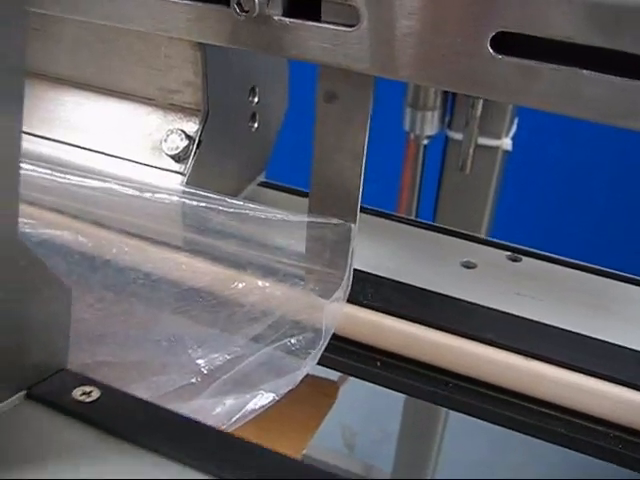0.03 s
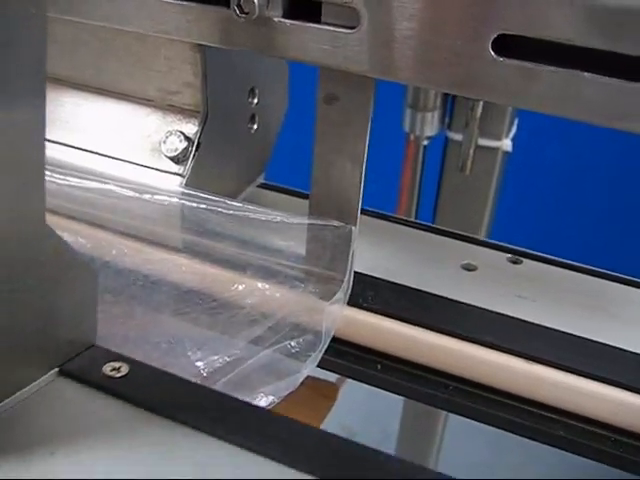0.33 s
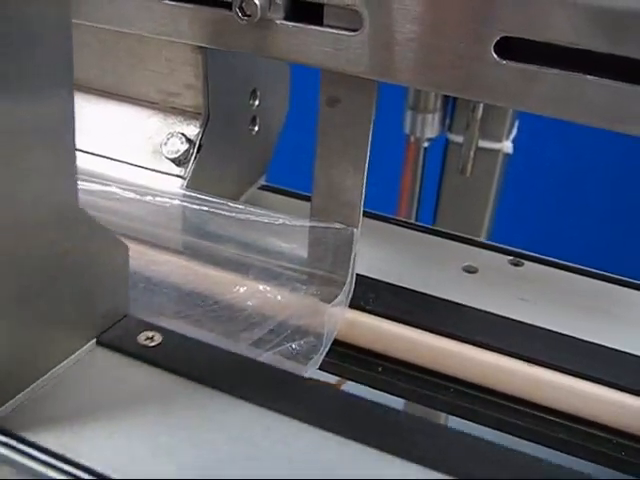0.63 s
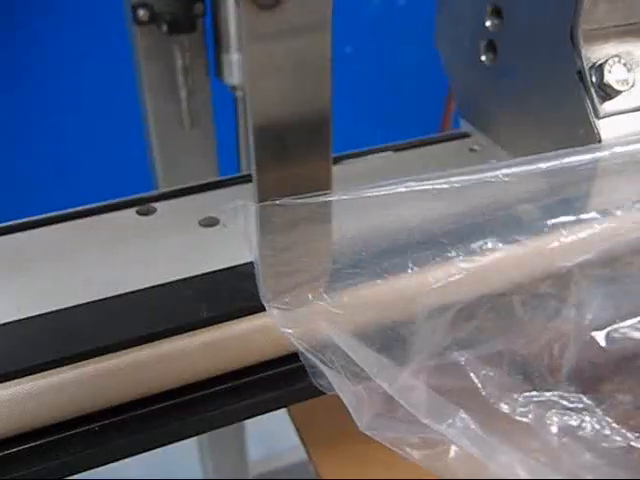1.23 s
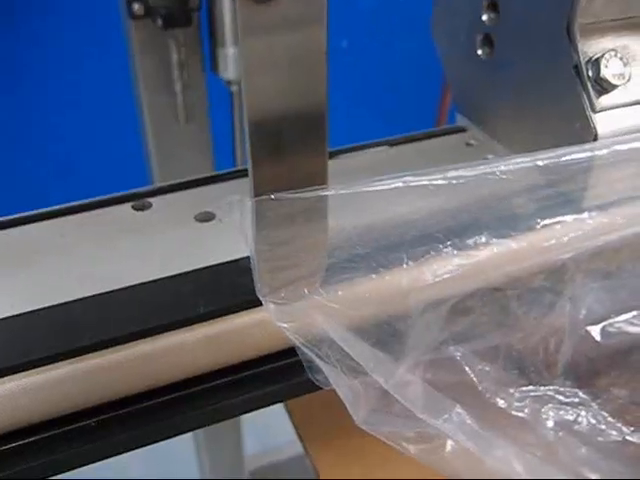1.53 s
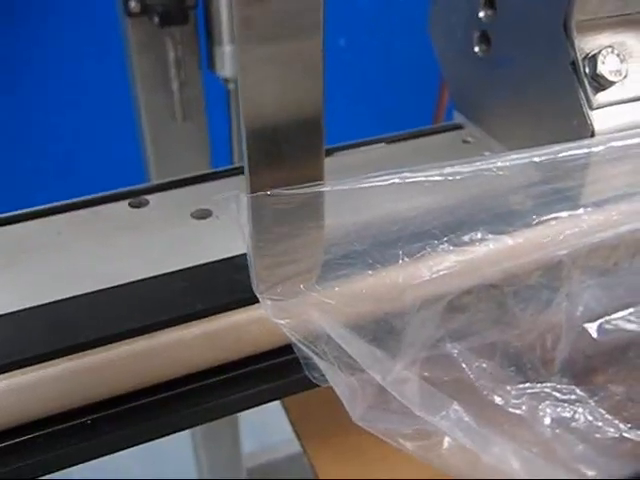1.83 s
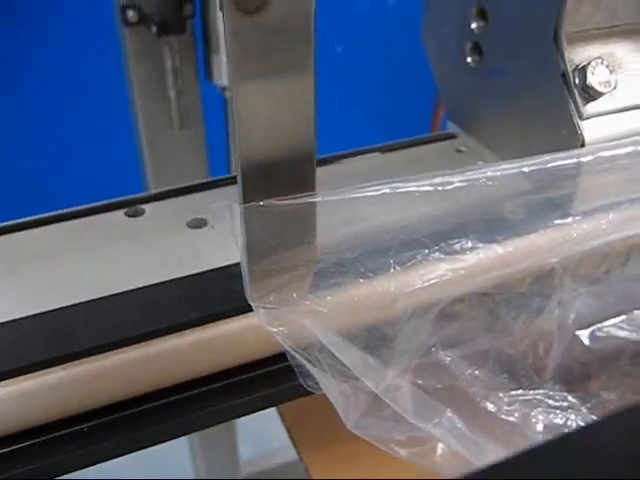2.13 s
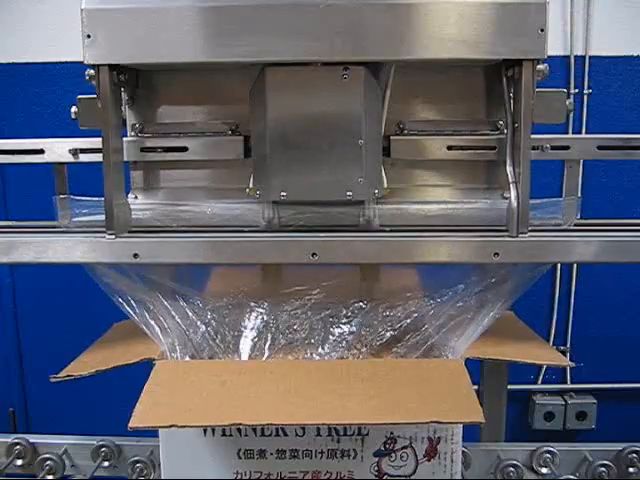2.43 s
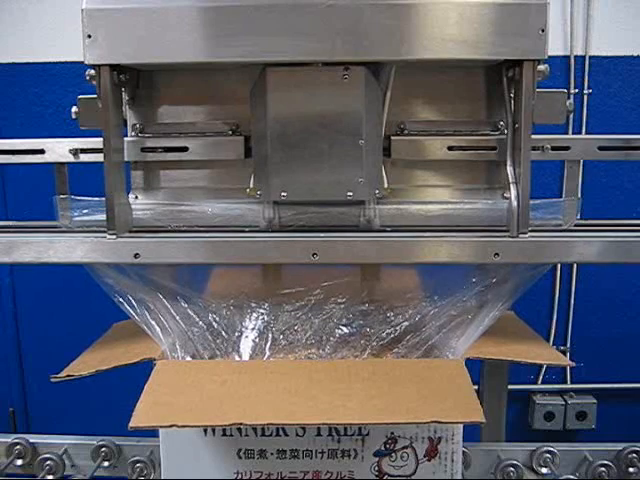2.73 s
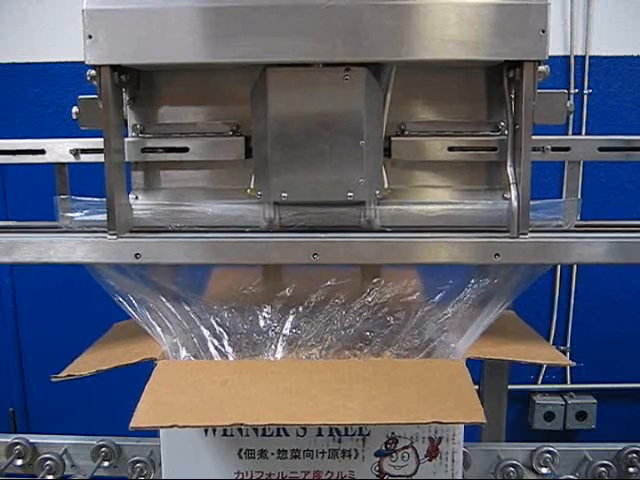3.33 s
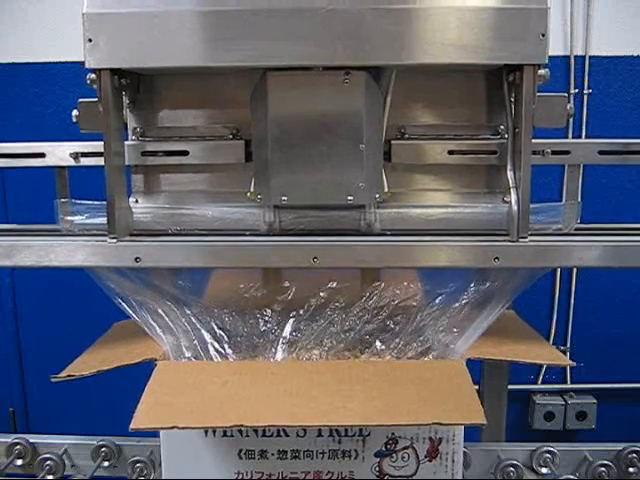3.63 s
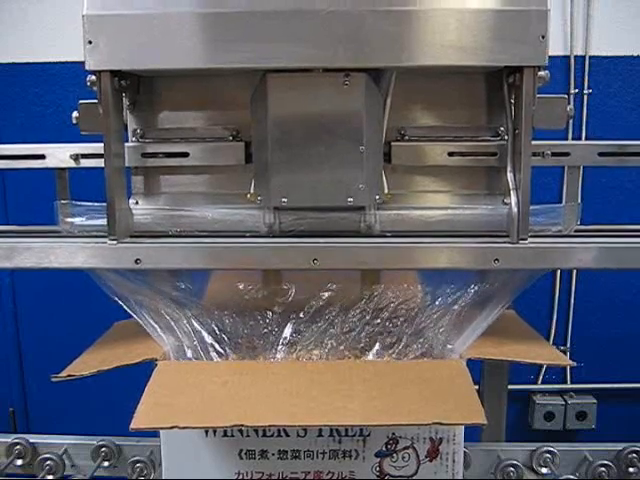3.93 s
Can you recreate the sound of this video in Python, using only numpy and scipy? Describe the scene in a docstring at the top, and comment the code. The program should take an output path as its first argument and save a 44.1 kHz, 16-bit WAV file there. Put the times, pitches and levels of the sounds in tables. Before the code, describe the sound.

A pneumatic bag sealer hisses and clanks, then draws air in a steady, hollow rush.

```python
"""Pneumatic vacuum bag sealer, one cycle, close to a small mono camera.
Valves exhaust air, a cylinder rod squeaks and clanks into its stop, the sealing jaws clunk shut.
Suction then builds to a steady, hollow rush that rings in the steel housing, over a motor hum.
Workshop noise lies underneath."""
import sys
import numpy as np
from scipy import signal
from scipy.fft import rfft, irfft
from scipy.io import wavfile

SR = 44100
rng = np.random.default_rng(int(sys.argv[2]) if len(sys.argv) > 2 else 0)


def materialize(psi):
    """Save the field psi as 16-bit PCM at rate SR to the path in sys.argv[1].

    A 1-D psi becomes a single channel; in a 2-D psi each row is a channel.
    """
    bounded = np.clip(np.atleast_2d(psi).T, -1, 1)
    quanta = np.round(bounded * 32767).astype(np.int16)
    wavfile.write(sys.argv[1], SR, quanta)


N = 176400
T = np.arange(N) / SR
HZ = np.fft.rfftfreq(N, 1 / SR)
IMPACT_RISE_S = 0.0014

# steel contact spectrum, for knocks and rod scrape: f/Hz, relative density/dB
CRACK_SPECTRUM = [(900, 2), (2100, -5), (2800, 2.5), (3600, 2), (4800, -4.5), (6300, -6), (8000, -2.5),
                  (8900, -19), (9800, -6), (10600, -8)]


def amp(db):
    """dB to gain."""
    return 10 ** (np.asarray(db) / 20)


def unit_rms(x):
    """Scale to rms 1."""
    return x / np.sqrt(np.mean(x ** 2) + 1e-20)


def drift(rate_hz):
    """Smooth random drift, unit rms."""
    return unit_rms(irfft(rfft(rng.standard_normal(N)) * np.exp(-(HZ / rate_hz) ** 2), N))


def noise(spectrum, peaks=()):
    """Unit-rms noise: broad outline, bass roll-off, narrow resonances."""
    f_hz, db = np.transpose(spectrum)
    outline_db = np.interp(np.log(HZ + 1), np.log(f_hz), db)
    rolloff_db = 20 * np.log10(1 + (f_hz[0] / 2 / (HZ + 1)) ** 2)
    peaks_db = sum(lift / (1 + (2 * (HZ - hz) / width) ** 2) for hz, width, lift in peaks)
    return unit_rms(irfft(rfft(rng.standard_normal(N)) * amp(outline_db - rolloff_db + peaks_db), N))


def envelope(start_s, rise_s, hold_s, t60_s):
    """Linear rise; exponential decay from hold_s after the start."""
    age_s = T - start_s
    return np.clip(age_s / rise_s, 0, 1) * amp(-60 * np.maximum(age_s - hold_s, 0) / t60_s)


def flutter(depth_db, rate_hz):
    """Unsteady gain of an air jet."""
    return amp(depth_db * drift(rate_hz))


def ring(modes, start_s, rise_s=0.001, hold_s=0):
    """Wavering modes of a steel part, driven for hold_s, then dying."""
    warped_s = np.cumsum(1 + 0.0061 * drift(rate_hz=94)) / SR
    return np.sqrt(2) * sum(amp(db) * envelope(start_s, rise_s, hold_s, t60_s)
                            * np.sin(2 * np.pi * (hz * warped_s + rng.random()))
                            for hz, db, t60_s in modes)


def low_pass(x, hz):
    """Steep FIR low-pass."""
    return signal.oaconvolve(x, signal.firwin(255, hz, window=("kaiser", 9), fs=SR)[None], "same")


def workshop():
    """Background noise of the workshop and idling machine."""
    # background: f/Hz, relative density/dB
    spectrum = [(25, -17.5), (100, -19), (290, -17.5), (520, -23), (900, -17), (1400, -22), (2200, -27.5),
                (3300, -22.5), (10500, -36.5)]
    # background: t/s, level/dB
    levels = [(0.05, -41), (0.76, -43.5), (0.9, -41), (1.3, -40.5), (1.85, -42.5)]
    return noise(spectrum) * amp(np.interp(T, *np.transpose(levels)))


def room(x, level_db=-18, corner_hz=2600):
    """Dull, diffuse workshop reverberation, wet only."""
    tail = irfft(rfft(rng.standard_normal(N)) / np.hypot(1, HZ / corner_hz), N)
    tail *= envelope(0.0036, 0.0066, 0, t60_s=0.37)
    return amp(level_db) * signal.fftconvolve(x, tail / np.linalg.norm(tail))[:N]


def panels(x, echo_db=-10):
    """Adds dense, short reflections from the steel around the jets."""
    echo = rng.standard_normal(N) * envelope(0, 0.0017, 0, t60_s=0.078)
    return x + amp(echo_db) * signal.fftconvolve(x, echo / np.linalg.norm(echo))[:N]


def seep():
    """Throttled air hisses softly as the cylinder travels."""
    # hiss: f/Hz, relative density/dB
    spectrum = [(1150, -2), (1350, 3), (2200, -17), (2900, -9), (3350, 2), (3900, -2), (4900, 0),
                (5500, -9), (6300, -2.5), (7750, -5), (8700, -22), (10300, -23)]
    # throttle whistle: f/Hz, width/Hz, lift/dB
    whistle = [(3320, 85, 6)]
    # hiss: t/s, level/dB
    levels = [(1.4, -41), (1.47, -39), (1.6, -38.5), (1.79, -36.5), (1.87, -43), (2.06, -39.5), (2.1, -33)]
    level_db = np.interp(T, *np.transpose(levels), left=-120, right=-120)
    return noise(spectrum, whistle) * amp(level_db) * flutter(depth_db=0.8, rate_hz=100)


def vent(start_s=0.94, blast_db_per_s=-110, tail_db_per_s=-46):
    """A hard, hollow air blast dies into a slower, lower tail."""
    # vented air: f/Hz, relative density/dB
    spectrum = [(180, -32), (580, -17.5), (800, -7), (1200, 2), (1550, -3), (2000, -17), (2600, -17.5),
                (3500, -7.5), (4900, -14), (7600, -14.5), (8800, -34), (9700, -12.5), (10500, -44)]
    # blast and tail resonances: f/Hz, width/Hz, lift/dB
    blast_peaks = [(1420, 150, 4.9)]
    tail_peaks = [(1160, 160, 7), (1520, 220, -4), (5500, 170, 8)]
    age_s = np.maximum(T - start_s, 0)
    blast = noise(spectrum, blast_peaks) * amp(-16 + blast_db_per_s * age_s)
    tail = noise(spectrum, tail_peaks) * amp(-24 + tail_db_per_s * age_s)
    return (blast + tail) * envelope(start_s, rise_s=0.0097, hold_s=0.26, t60_s=0.12)


def exhausts(spit_db=3.5, spit_s=0.0084):
    """Each valve opens with a spit; its sputtering hiss sinks with the pressure."""
    # valve openings: t/s, length/s, level/dB, fade/dB, fade exponent, rise/s
    openings = [(0.137, 0.69, -26, -21.5, 1.98, 0.0092), (2.074, 0.6, -21.5, -12.5, 0.88, 0.012)]
    # one jet spectrum per opening: f/Hz, relative density/dB
    spectra = [
        [(420, -13.5), (1000, -10), (1400, -3), (2250, -8.5), (3050, 0.5), (3700, 0), (4400, -4), (6600, -7),
         (7700, -5), (8900, -17), (10300, -35)],
        [(150, -9), (650, -8.5), (850, 0), (1400, 0.5), (2050, -8.5), (2850, 1.5), (3600, 0), (4200, 1),
         (4700, -5), (8200, -5.5), (8900, -16.5), (10300, -23)],
    ]
    # port resonance: f/Hz, width/Hz, lift/dB
    port = [(2950, 140, 3)]
    jets = np.zeros(N)
    for (start_s, length_s, db, fade_db, exponent, rise_s), spectrum in zip(openings, spectra):
        age_s = np.clip(T - start_s, 0, length_s)
        level_db = db + fade_db * (age_s / length_s) ** exponent + spit_db * np.exp(-age_s / spit_s)
        jets += noise(spectrum, port) * amp(level_db) * envelope(start_s, rise_s, length_s, t60_s=0.093)
    step_db = -2.5 * (T > 2.297)  # last exhaust drops abruptly
    return jets * amp(step_db) * flutter(depth_db=1.0, rate_hz=190)


def linkage():
    """The sliding rod squeaks and hits its stop, a latch pings, frame and clamp ring as jaws close."""
    # modes of each steel part: f/Hz, level/dB, t60/s
    rod = [(1357, -13.5, 0.1), (9730, -31.5, 0.12)]
    stop = [(3270, -18, 0.093), (7860, -28, 0.11)]
    latch = [(920, -24.5, 0.25), (2930, -20.5, 0.032)]
    frame = [(272.5, -39.5, 0.7), (697, -38.5, 1.5), (1410, -33, 0.21)]
    clamp = [(2790, -21.5, 0.1), (3620, -26, 0.11)]
    slide = dict(start_s=1.2005, rise_s=0.0018, hold_s=0.012)
    scrape = amp(-21.5) * noise(CRACK_SPECTRUM) * envelope(**slide, t60_s=0.063)
    squeak = ring(rod, **slide)
    return (scrape + squeak + ring(stop, start_s=1.2435) + ring(latch, start_s=1.3875)
            + ring(frame, start_s=1.437) + ring(clamp, start_s=2.396))


def clunks():
    """Heavy parts seat, each swinging in its damped lowest mode."""
    # seatings: t/s, f/Hz, peak/dB, t60/s
    seatings = [(0.085, 299, -41, 0.28), (1.163, 199, -23.5, 0.2), (1.4184, 180, -13.5, 0.064),
                (1.4385, 730, -3.5, 0.034), (2.3959, 281, -7.5, 0.047), (2.404, 186, -16.5, 0.11),
                (2.414, 440, -7, 0.03)]
    return sum(amp(db) * envelope(t_s, IMPACT_RISE_S, 0, t60_s) * np.sin(2 * np.pi * hz * (T - t_s))
               for t_s, hz, db, t60_s in seatings)


def knocks(hold_s=0.0015):
    """Each jaw blow sets off a short thump, panel body and crack."""
    # blows: t/s, thump/dB, body/dB, crack/dB, t60/s
    blows = [(0.84, -54, -30, -34.5, 0.035), (0.928, -36, -28, -33, 0.054), (1.162, -33, -33, -47, 0.15),
             (1.1998, -25, -23.5, -24, 0.16), (1.218, -38, -31, -20, 0.011),
             (1.243, -44, -24.5, -17.5, 0.085), (1.29, -48, -31, -36, 0.045),
             (1.387, -33, -24.5, -26.5, 0.28), (1.4186, -25, -21.5, -23.5, 0.14),
             (1.4343, -33, -7.5, -12.5, 0.053), (1.448, -35, -16, -31, 0.032),
             (2.395, -16.5, -14.5, -15, 0.035), (2.404, -34, -23, -21.5, 0.056),
             (2.414, -18, -13.5, -21.5, 0.087)]
    # thump and panel body: f/Hz, relative density/dB
    thump_spectrum = [(80, -24), (180, 3.5), (330, -1), (550, -6), (900, -25)]
    body_spectrum = [(250, -37), (480, -8.5), (640, -0.5), (880, -1), (1080, -5.5), (1350, 1), (1750, -18),
                     (3000, -45)]
    thump, body, crack = noise(thump_spectrum), noise(body_spectrum), noise(CRACK_SPECTRUM)
    out = np.zeros(N)
    for start_s, thump_db, body_db, crack_db, t60_s in blows:
        burst = amp(thump_db) * thump + amp(body_db) * body + amp(crack_db) * crack
        out += burst * envelope(start_s, IMPACT_RISE_S, hold_s, t60_s)
    return out


def suction():
    """Air rushes through the steel housing, building to a steady flow over a motor hum."""
    # flow build-up: t/s, roar/dB, hiss/dB
    levels = [(2.42, -36, -32), (2.57, -31, -37), (2.75, -24, -29), (2.95, -21, -25), (3.3, -18.5, -23),
              (4.0, -18, -22)]
    # hollow roar and hiss: f/Hz, relative density/dB
    roar_spectrum = [(30, -12.5), (90, -24.5), (200, -15.5), (270, -15.5), (320, -4.5), (500, -10),
                     (800, -4.5), (1100, -3), (1420, -10), (1650, -14), (2100, -19), (4000, -60)]
    hiss_spectrum = [(1200, -17), (2300, -6.5), (3000, 2.5), (3700, 1), (4300, -0.5), (4800, -4),
                     (6200, -6.5), (7000, -4.5), (8100, -6), (9000, -20), (9900, -5), (10600, -19)]
    # housing resonances and notches: f/Hz, width/Hz, lift/dB
    housing = [(543, 32, 6.5), (663, 26, 10), (710, 32, -15), (779, 49, 7), (965, 66, -7), (1044, 23, 7.5),
               (1095, 70, 6), (1260, 37, 5.5), (1453, 47, 10), (4140, 52, 10.5), (6830, 63, 11)]
    # motor hum at full flow: f/Hz, level/dB
    motor_tones = [(59, -47), (117, -43.5)]
    t_s, roar_db, hiss_db = np.transpose(levels)
    roar_gain, hiss_gain = (amp(np.interp(T, t_s, db, left=-120)) for db in (roar_db, hiss_db))
    hum = np.sqrt(2) * sum(amp(db) * np.sin(2 * np.pi * hz * T + 0.85 * drift(rate_hz=3.9))
                           for hz, db in motor_tones)
    warped_s = T + 0.009 * np.cumsum(drift(rate_hz=14)) / SR  # resonances wander with the flow
    roar = np.interp(warped_s, T, noise(roar_spectrum, housing), period=N / SR)
    roar *= flutter(depth_db=0.64, rate_hz=44)
    hiss = noise(hiss_spectrum, housing)
    return roar_gain * roar + hiss_gain * hiss + hum * roar_gain / roar_gain.max()


def scene():
    """Machine, air and workshop at one microphone; the blows carry into the room."""
    blows = knocks() + clunks()
    mechanics = blows + room(blows) + linkage()
    jets = panels(exhausts() + vent() + seep())
    mono = mechanics + jets + suction() + workshop()
    return np.array([mono, mono])


def record(dry, ceiling=0.59, knee=3.4, dc_offset=0.046):
    """Camera: rounds off peaks, samples at half rate (top treble mirrors upward), adds DC."""
    rounded = dry / (1 + abs(dry / ceiling) ** knee) ** (1 / knee)
    half_rate = low_pass(rounded, hz=10500) * 2 * (np.arange(N) % 2)
    return low_pass(half_rate, hz=12850) + dc_offset


dry = scene()
out = record(dry)
materialize(out)
```